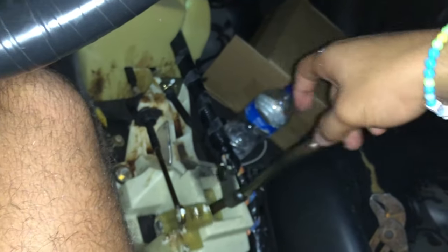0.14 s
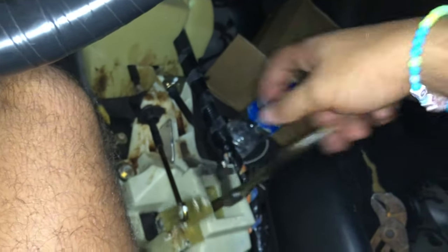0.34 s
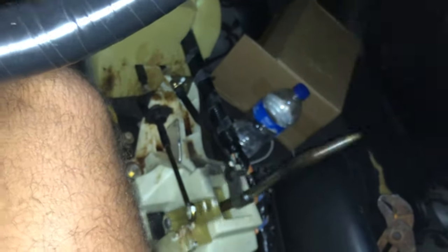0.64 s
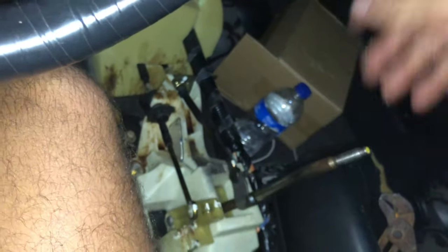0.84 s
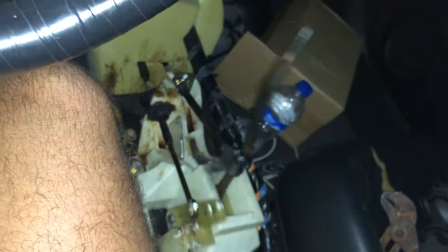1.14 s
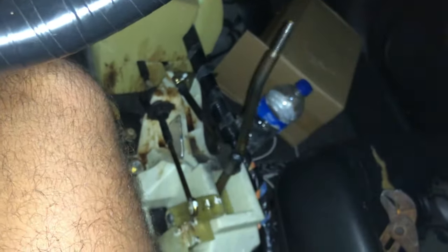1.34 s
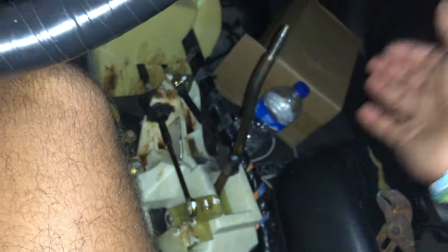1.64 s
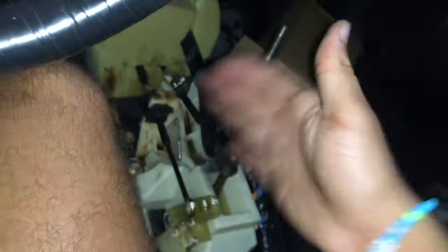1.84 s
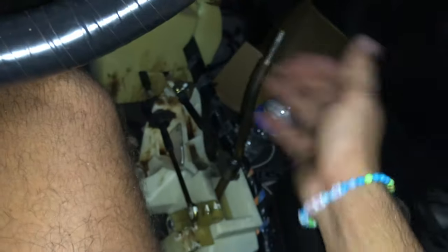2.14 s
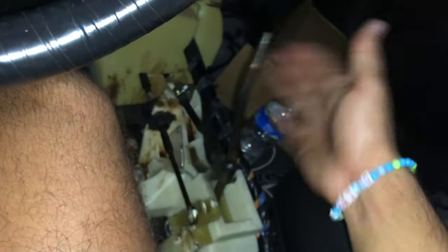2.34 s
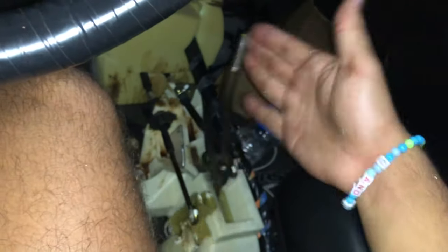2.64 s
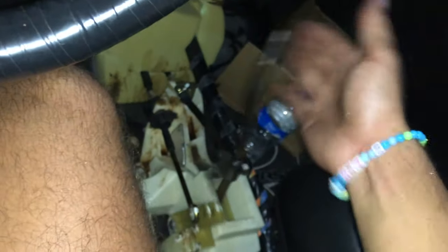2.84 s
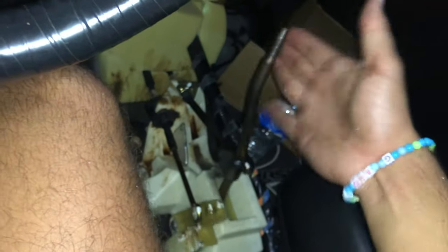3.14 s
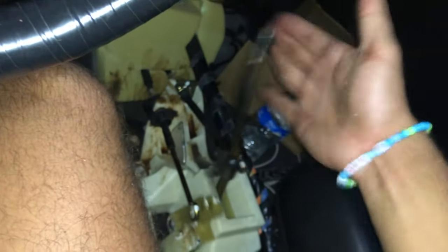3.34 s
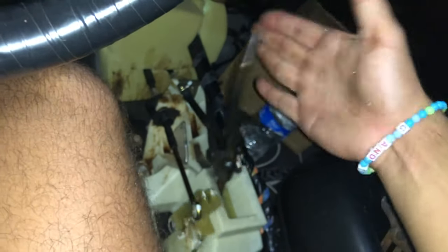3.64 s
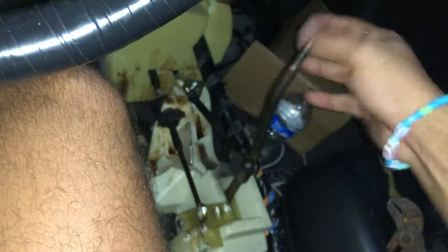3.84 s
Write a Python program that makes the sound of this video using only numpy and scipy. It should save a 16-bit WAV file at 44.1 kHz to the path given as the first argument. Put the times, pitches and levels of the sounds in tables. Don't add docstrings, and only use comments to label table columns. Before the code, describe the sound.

A loose gear shift lever clacks hard in its plastic housing, wiggled irregularly from 0 to 1.4 seconds, with ticks, hollow thumps, chattering slack parts and brief steel pings. Near-quiet follows, with only faint low cabin hum. From about 2.1 seconds slaps start softly, then grow into dense clatter around 2.4-3.1, a slight cloth-like scrape near 3, lighter rattles, and loud clacks again at 3.75-3.9. Close, dry car interior.

```python
import sys
import numpy as np
from scipy import signal
from scipy.fft import rfft, irfft, next_fast_len
from scipy.io import wavfile
from scipy.ndimage import map_coordinates

SR = 44100
rng = np.random.default_rng(int(sys.argv[2]) if len(sys.argv) > 2 else 0)


def digitize_waveform(pressure):
    field = np.atleast_2d(pressure).T
    bounded = np.clip(field, -1, 1)
    quanta = np.round(bounded * 32767).astype(np.int16)
    wavfile.write(sys.argv[1], SR, quanta)


def voltage_ratio(level):
    return 10 ** (np.asarray(level, float) / 20)


N = 176400
T = np.arange(SR // 5) / SR

# (time [s], peak level [dB], deep thud
# over peak [dB], panel knock over peak [dB], treble over peak [dB])
LEVER_STOPS = [(0.1352, -7.5, -29.5, -26, -23), (0.21, -12.5, -28, -19, -20.5),
               (0.2898, -11.5, -14, -7, -30.5), (0.403, -6.5, -24.5, -15, -25),
               (0.522, -11.5, -14, -10.5, -33), (0.5894, -4, -26.5, -12.5, -22.5),
               (0.7525, -6.5, -33, -25, -18.5), (0.825, -15, -29, -26, -19.5),
               (0.8521, -17, -28.5, -28, -25), (1.057, -1.5, -19, -3, -31.5),
               (1.1407, -4, -38, -27, -16.5), (1.1566, -9.5, -18.5, -14.5, -10),
               (1.286, -11.5, -31, -14, -14), (1.3592, -28.5, -23, -19, -23),
               (2.0807, -20.5, -21, -11, -24), (2.094, -28, -19, 11.5, -32),
              (2.1888, -24, -20.5, -10.5, -27), (2.31, -18, -17.5, -9, -17), (2.417, -9, -32, -13, -16.5),
              (2.472, -14.5, -19, -17, -17.5), (2.6028, -13.5, -20, -7.5, -13.5),
              (2.6805, -17.5, -12, 0.5, -38), (2.7405, -4, -32, -11, -26), (2.825, -8.5, -12, 1.5, -30.5),
              (2.8869, -3, -33, -7, -25), (3.051, -7, -20.5, -15, -24), (3.1801, -30.5, -3, 2.5, -24),
              (3.3323, -23, -6, 3, -48), (3.4992, -11.5, -19, -17, -14.5), (3.637, -33.5, 2, 4, -30),
              (3.7642, -5, -17.5, -4, -30.5), (3.8545, -4, -36, -13.5, -25.5)]
# (time [s], peak level [dB], panel knock over peak [dB], length [s])
SLACK_CHATTER = [(0.0, -18.5, -28, 0.0089), (0.191, -26, -15.5, 0.018), (0.457, -12, 7.5, 0.022),
                 (0.671, -7.5, -7.5, 0.018), (0.801, -41, 7.5, 0.008), (0.811, -35, -18, 0.017),
                 (1.008, -24, -18, .01), (1.017, -7.5, -16, 0.014), (1.2, -14, 13, 0.024),
                 (1.335, -31.5, -8, 0.015), (1.385, -35, -16.5, 0.0088), (1.734, -47.5, -23, 0.0075),
                 (2.216, -38, -16, 0.0043), (2.456, -21, 13, 0.03), (2.492, -34.5, 21.5, 0.031),
                 (2.626, -10.5, 13.5, 0.025), (2.693, -27, -15, 0.015), (2.782, -3.5, -3.5, 0.013),
                 (2.928, -6.5, -3, 0.016), (3.063, -13.5, 7.5, 0.026), (3.254, -31.5, -22, 0.02),
                 (3.278, -32.5, 5, 0.014), (3.29, -33.5, -9, 0.02), (3.382, -22.5, 9, 0.014),
                 (3.522, -13.5, 5.5, 0.029), (3.654, -34.5, 1, 0.016), (3.709, -34, -17, .008),
                 (3.734, -21.5, 8.5, 0.017), (3.895, -19.5, -0.5, 0.011), (3.903, -9.5, -9, 0.016)]
# (time [s], peak level [dB], pitch [Hz], length [s])
HOLLOW_THUMPS = [(0.146, -22, 344, 0.014), (0.192, -31.5, 330, 0.023), (0.298, -12, 311, 0.01),
                 (0.416, -12, 341, 0.014), (0.455, -24.5, 330, 0.032), (0.532, -9.5, 321, 0.0087),
                 (0.599, -13.5, 343, 0.016), (0.678, -14.5, 321, 0.015), (0.764, -18.5, 326, 0.015),
                 (0.807, -26, 312, 0.019), (0.845, -35, 312, 0.021), (1.016, -21.5, 331, 0.015),
                 (1.068, -13, 277, 0.016), (1.147, -13.5, 349, 0.015), (1.162, -18.5, 299, 0.022),
                 (1.214, -15.5, 360, 0.013), (1.286, -21.5, 332, 0.011), (1.342, -38.5, 286, 0.02),
                 (2.101, -18, 302, 0.013), (2.184, -35, 366, 0.02), (2.316, -22.5, 330, 0.014),
                 (2.427, -18.5, 345, 0.013), (2.484, -22, 350, 0.02), (2.609, -22, 304, 0.022),
                 (2.643, -13.5, 336, 0.011), (2.683, -21, 370, 0.018), (2.741, -14, 334, 0.019),
                 (2.783, -17, 357, 0.018), (2.829, -17.5, 374, 0.016), (2.891, -14.5, 327, 0.019),
                 (2.937, -13, 326, 0.015), (3.053, -19, 288, 0.0088), (3.071, -21.5, 324, 0.017),
                 (3.184, -30, 340, 0.013), (3.284, -26.5, 340, 0.016), (3.34, -22.5, 345, 0.017),
                 (3.393, -31.5, 387, 0.026), (3.419, -32, 312, 0.023), (3.452, -33, 356, 0.017),
                 (3.498, -27, 344, 0.023), (3.529, -16, 332, 0.016), (3.585, -37.5, 367, 0.025),
                 (3.64, -25.5, 344, 0.013), (3.763, -16.5, 360, 0.012), (3.799, -18, 334, 0.014),
                 (3.866, -13.5, 311, 0.014), (3.909, -18, 324, 0.014)]
# (time [s], peak level [dB], high modes over peak [dB], spring over peak [dB])
ROD_CONTACTS = [(.264, -24, -35, -19), (.290, -44, -30, -5), (.361, -25.5, -34, -18),
                (.553, -9.5, -10.5, -56), (.6015, -1.5, -7.5, -39), (.618, -25, -33, -14),
                (1.075, -41.5, -33, -3.5), (1.093, -20, -22.5, -46), (1.1203, -5.5, -9.5, -26.5),
                (1.156, -3, -5, -41.5), (2.386, -26.5, -29.5, -47), (2.539, -29, -32, -20),
                (2.551, -20.5, -43, -33), (2.8435, -22, -18, -35), (3.354, -20.5, -28, -40),
                (3.418, -24.5, -36, -39), (3.739, -19, -14, -33), (3.767, -48, -19, -15),
                (3.802, -8.5, -10, -52)]

# (frequency [Hz], level [dB], decay t60 [s])
THUD_MODES = [(136, 0.5, 0.13), (206, 3.5, 0.099)]
SHELL_MODES = [(1216, -9, .024), (1580, -12, .022), (2241, -3, .022), (3086, -4, 0.016), (4017, -4, 0.017)]
PANEL_MODES = [(520, -4, .04), (612, 0, .045), (800, -3, .035), (950, -6, .03)]
# (frequency [Hz], level [dB], decay t60 [s])
ROD_MODES = [(2230, -8, .035), (3700, -4, .045), (5900, -2, .055), (7700, -6, .03)]
ROD_HIGH_MODES = [(10500, -5, .015), (12050, -6, .022), (14280, -5, .045), (15000, -8, .03)]
SPRING_MODES = [(4400, 0, 0.2)]

# (frequency [Hz], level [dB])
GRIT_SPECTRUM = [(450, -6), (1000, -4.5), (1800, -11), (3800, -6.5), (9000, -22.5), (12000, -42)]
FIZZ_SPECTRUM = [(4500, -10), (7000, -4), (10500, -6), (14900, -16.5), (16200, -33.5)]
# (frequency [Hz], level [dB])
HUM_SPECTRUM = [(25, -33), (36, -19.5), (57, -6.5), (82, -17.5), (206, -20), (263, -29), (450, -30),
                (16000, -67)]
STIR_SPECTRUM = [(700, -18), (1390, -7), (1670, -4), (1900, -9), (2210, 2), (2500, -15), (2930, -9),
                 (9000, -38)]
# (time [s], level [dB])
STIR_COURSE = [(0, -55), (.1, -57.5), (0.899, -56), (1.5, -69.5), (2.8, -66), (2.98, -40.5), (3.249, -45),
               (3.45, -50), (4, -59)]
# (time [s], level [dB])
RUMBLE_COURSE = [(0, -1.5), (1, 3), (1.15, 8.5), (1.6, -0.5), (3.7, 2), (3.85, 14.5), (4, -1)]
# (frequency [Hz], t60 [s])
ROOM_DECAY = [(200, 0.09), (2000, 0.09), (12000, 0.04)]


def unit(x):
    return x / np.sqrt(np.mean(x ** 2) + 1e-20)


def along(points, hz):
    f, v = np.transpose(points)
    return np.interp(np.log(hz + 1), np.log(f + 1), v)


def noise(spectrum):
    size = next_fast_len(N + 8192)
    closed = [(spectrum[0][0] / 2, -120)] + list(spectrum) + [(SR / 2, -120)]
    gain = voltage_ratio(along(closed, np.fft.rfftfreq(size, 1 / SR)))
    return unit(irfft(rfft(rng.standard_normal(size)) * gain, size)[:N])


def wobble(rate):
    knots = rng.standard_normal(int(N * rate / SR) + 4)
    return map_coordinates(knots, [np.arange(N) * rate / SR])


def add(track, s, sound):
    i = max(round(s * SR), 0)
    track[i:i + len(sound)] += sound[:N - i]


def ring(modes, attack_s, detune, vary_db):
    hz, db, t60 = np.transpose(modes)[:, :, None]
    level, pitch, phase = rng.standard_normal((3, len(modes), 1))
    gain = voltage_ratio(db + vary_db * level - 60 * T / t60)
    tones = gain * np.sin(2 * np.pi * (hz * (1 + detune * pitch) * T + phase))
    return tones.sum(0) * (1 - np.exp(-(T / attack_s) ** 2))


def dying(t60, attack_s):
    return voltage_ratio(-60 * T / t60) * (1 - np.exp(-T / attack_s))


def housing():
    grit, fizz, tones = np.zeros((3, N))
    for s, db, deep_db, panel_db, top_db in LEVER_STOPS:
        tick_db = -15 - max(deep_db + 22.5, 0)
        for lead_s, level_db in ((.004, tick_db), (0, 0)):
            clack = dying(0.037, 0.00012) + 0.87 * dying(0.0096, .0002)
            add(grit, s - lead_s, voltage_ratio(db + level_db - 11.5) * clack)
            add(fizz, s - lead_s, voltage_ratio(db + level_db + top_db + 6.5) * dying(0.026, 0.00085))
        add(tones, s, voltage_ratio(db - 6) * ring(SHELL_MODES, 0.0013, detune=0.034, vary_db=2.0))
        add(tones, s, voltage_ratio(db + panel_db - 0.5) * ring(PANEL_MODES, 0.005, detune=0.05, vary_db=2.0))
        add(tones, s, voltage_ratio(db + deep_db + 5.0) * ring(THUD_MODES, 0.011, detune=0.03, vary_db=1.5))
    for s, db, panel_db, length in SLACK_CHATTER:
        u = T / length
        shake = (0.12 + 1.22 * u) * np.exp(-u ** 2.4 * 2.19)
        add(grit, s, voltage_ratio(db - 10) * shake)
        add(fizz, s, voltage_ratio(db - 27.5) * shake)
        knock = ring(PANEL_MODES, 0.66 * length, detune=0.014, vary_db=7.0)
        add(tones, s, voltage_ratio(db + panel_db + 1.0) * knock)
    lumps_db = 2.6 * wobble(250) + 2.6 * wobble(900)
    rough = grit * noise(GRIT_SPECTRUM) + fizz * noise(FIZZ_SPECTRUM)
    return voltage_ratio(0.44 * lumps_db) * tones + voltage_ratio(lumps_db) * rough


def thumps():
    out = np.zeros(N)
    for s, db, hz, length in HOLLOW_THUMPS:
        choked = np.exp(-(T / length) ** 11.0)
        held = choked + 0.2 * voltage_ratio(-60 * T / .08)
        boom = ring([(hz, 0, .3), (0.91 * hz, -9, .1)], .0075, .003, vary_db=0.8)
        add(out, s - .003, voltage_ratio(db + 2.0) * held * boom)
    return out * voltage_ratio(1.5 * wobble(220))


def rod():
    out, crack = np.zeros((2, N))
    for s, db, top_db, spring_db in ROD_CONTACTS:
        add(out, s, voltage_ratio(db - 17.5) * ring(ROD_MODES, 0.00044, 0.003, vary_db=1.5))
        add(out, s, voltage_ratio(db + top_db - 1.5) * ring(ROD_HIGH_MODES, 0.00073, .006, vary_db=0.5))
        add(out, s, voltage_ratio(db + spring_db) * ring(SPRING_MODES, 0.0014, 0.003, vary_db=3.0))
        add(crack, s, voltage_ratio(db - 13) * dying(0.022, .0003))
    crack_noise = noise([(1500, -1.5), (5000, -5.0), (10000, -15), (15500, -28.0)])
    return voltage_ratio(5.7 * wobble(200)) * (out + crack * crack_noise)


def walls(x):
    hz, t, z = signal.stft(rng.standard_normal(SR // 4), SR, nperseg=256)
    decay = voltage_ratio(-60 * t / along(ROOM_DECAY, hz)[:, None])
    tail = signal.istft(z * decay, SR, nperseg=256)[1]
    return signal.fftconvolve(np.pad(x, (130, 0)), tail / np.linalg.norm(tail))[:N]


def cabin():
    seconds = np.arange(N) / SR
    stir_db = np.interp(seconds, *np.transpose(STIR_COURSE)) - 9
    grain_db = 2.1 * wobble(30) + 3.6 * wobble(200)
    stir = voltage_ratio(stir_db + grain_db) * noise(STIR_SPECTRUM)
    hum = noise(HUM_SPECTRUM)
    low = signal.sosfilt(signal.butter(2, 110, fs=SR, output="sos"), hum)
    rumble = voltage_ratio(np.interp(seconds, *np.transpose(RUMBLE_COURSE))) - 1
    return voltage_ratio(-48 + .8 * wobble(6.3)) * (hum + rumble * low) + stir


def scene():
    lever = housing() + thumps() + rod()
    return (lever + voltage_ratio(-9) * walls(lever) + cabin())[None]


def band_limit(x):
    return signal.sosfilt(signal.butter(12, 16620, fs=SR, output="sos"), x)


def record(dry):
    heard = signal.sosfilt(signal.butter(3, 44, "high", fs=SR, output="sos"), dry)
    heard = heard / (1 + np.abs(heard / .95) ** 4) ** .25
    return band_limit(heard)


dry = scene()
out = record(dry)
digitize_waveform(out)
```